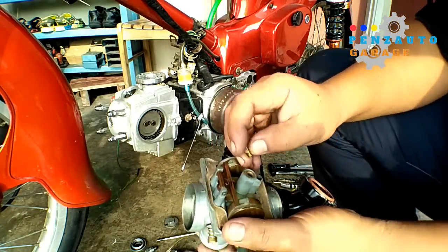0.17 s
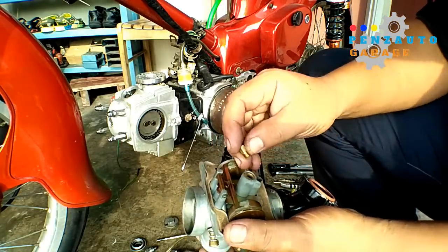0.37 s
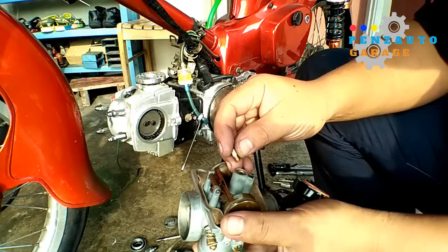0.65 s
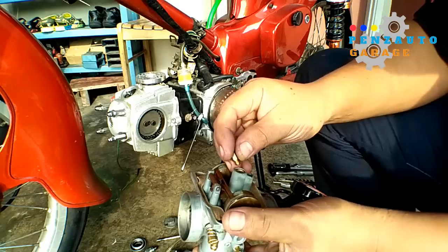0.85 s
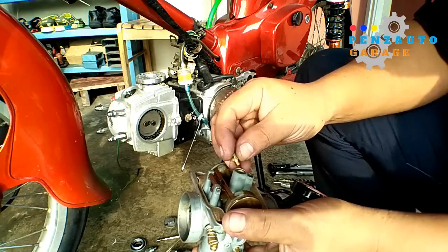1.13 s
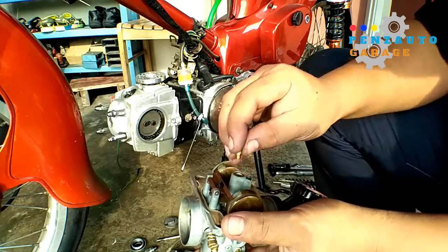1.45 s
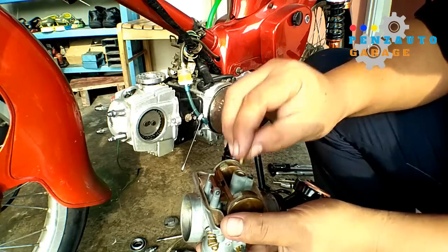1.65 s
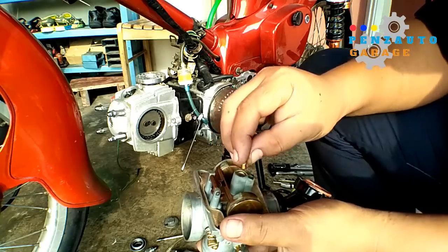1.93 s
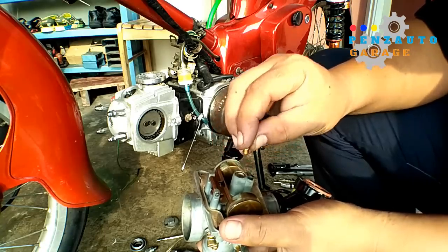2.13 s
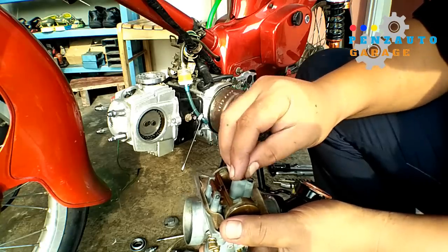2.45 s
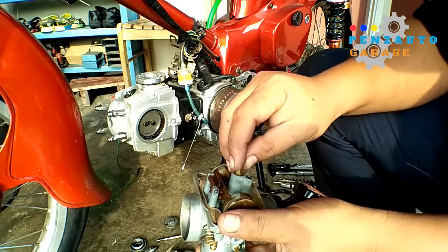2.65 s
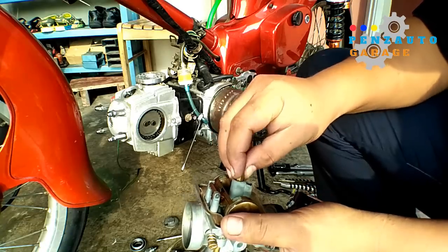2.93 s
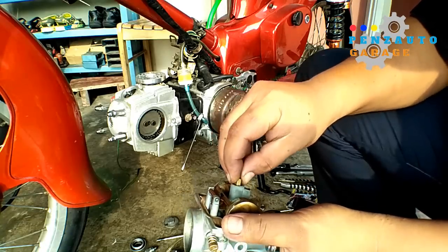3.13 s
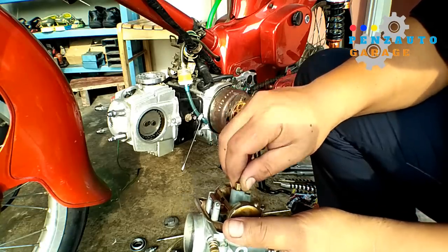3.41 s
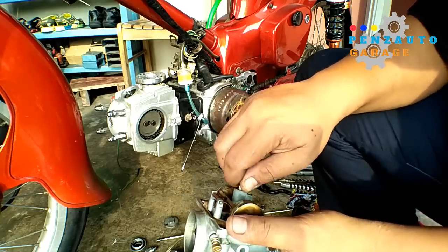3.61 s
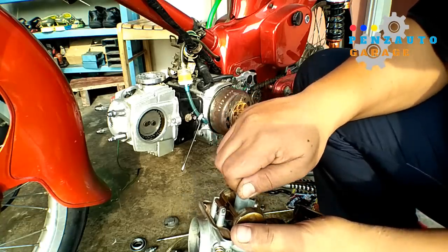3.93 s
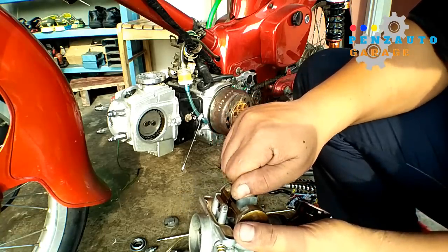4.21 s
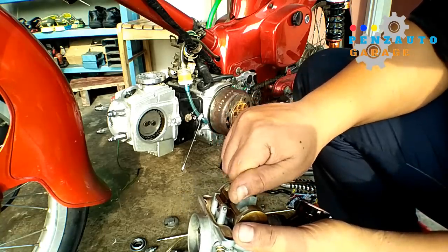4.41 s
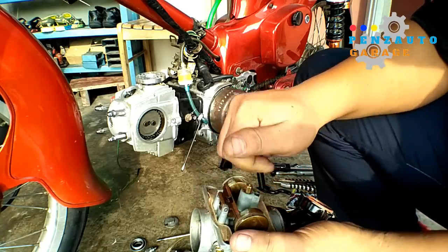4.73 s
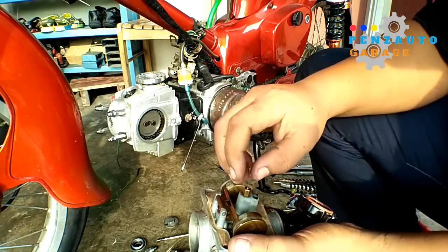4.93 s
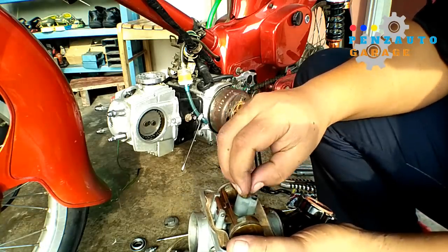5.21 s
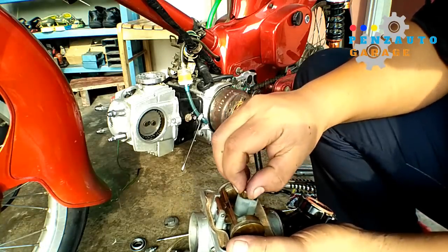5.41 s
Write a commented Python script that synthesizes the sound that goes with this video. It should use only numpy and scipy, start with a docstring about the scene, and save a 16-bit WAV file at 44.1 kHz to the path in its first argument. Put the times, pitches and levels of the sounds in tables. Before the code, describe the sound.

Small metal parts tick and snap hard into a carburettor body up close, over soft street rumble, a brief far squeal and insect buzz.

```python
"""Small brass parts are pushed into a hand-held carburettor body, close to a phone in an open workshop.
Each contact is a burst of uneven micro-impacts that also rings the casting's modes; a short room tail follows.
Outside: traffic and hiss (shaped noise), engine drones (wavering sines), a far squeal (gliding tone and noise),
a rasping bird (falling noise band) and a shrill insect (pulsed buzz and whistle).
The loudest snaps push the phone's gain down; it then recovers at 4 dB per second."""
import sys
import numpy as np
from scipy import signal
from scipy.fft import rfft, irfft
from scipy.io import wavfile
from scipy.ndimage import uniform_filter1d

SR = 44100
rng = np.random.default_rng(int(sys.argv[2]) if len(sys.argv) > 2 else 0)


def int16_out(signal):
    """Quantize to a 16-bit WAV file."""
    q = np.round(np.clip(np.atleast_2d(signal).T, -1, 1) * 32767)
    wavfile.write(sys.argv[1], SR, q.astype(np.int16))


N = 245181
T = np.arange(N) / SR


def undb(db):
    """Decibels to gain."""
    return 10 ** (np.asarray(db) / 20)


def unit(x):
    """Scale to rms 1."""
    return x / np.sqrt(np.mean(x ** 2))


def pan(db):
    """Port gains for a left minus right level difference."""
    return undb(np.vstack([db, -db]) / 2)


def bell(t, width_s):
    """Gaussian swell of height 1 around t = 0; width is one standard deviation."""
    return np.exp(-(t / width_s) ** 2 / 2)


def colour(x, points, size=4096):
    """Minimum-phase filter through (frequency [Hz], gain [dB]) points, built from the cepstrum."""
    hz, db = np.transpose(points)
    f = np.maximum(np.fft.rfftfreq(size, 1 / SR), 1)
    gain = undb(np.interp(np.log(f), np.log(hz), db))
    cepstrum = irfft(np.log(gain))
    # fold the cepstrum to make the response causal
    cepstrum[1:size // 2] *= 2
    cepstrum[size // 2 + 1:] = 0
    response = irfft(np.exp(rfft(cepstrum)))
    response = response.reshape((1,) * (x.ndim - 1) + (-1,))
    return signal.fftconvolve(x, response, axes=-1)[..., :x.shape[-1]]


def walk(rate_hz):
    """Slow random curve of rms 1: held random values, smoothed twice."""
    k = max(int(SR / rate_hz), 1)
    held = np.repeat(rng.standard_normal(N // k + 1), k)
    return unit(uniform_filter1d(uniform_filter1d(held, k), k)[:N])


def stereo_noise(side_db, size=N):
    """White noise for both ports: a shared part plus an opposed part at side_db."""
    mid, side = rng.standard_normal((2, size))
    return mid + undb(side_db) * side * np.array([[1], [-1]])


def band(hz, width_hz, side_db):
    """Noisy resonance: low-passed complex noise shifted to a centre that may move."""
    low = signal.butter(3, width_hz / 2, fs=SR, output="sos")
    slow = signal.sosfilt(low, stereo_noise(side_db) + 1j * stereo_noise(side_db))
    carrier = np.exp(2j * np.pi * np.cumsum(hz + 0 * T) / SR)
    return unit((slow * carrier).real)


def street(rumble_rest_db=-48.5, roar_rest_db=-55.5, air_db=-61.5):
    """Traffic rumble and tyre roar as swelling noise, engine drones as wavering sines, and a distant hiss."""
    # traffic swells: (peak time [s], width [s], rumble rise [dB], tyre roar rise [dB])
    traffic = [(.22, .16, 9, 11.5), (.92, 0.19, 7, 8.5), (1.5, 0.051, 1, 7), (2.7, 0.38, 6, 4.5),
               (5.6, 0.19, 9.5, 7.5)]
    # noise spectra: (frequency [Hz], relative density [dB per Hz])
    rumble_spectrum = [(20, -23.5), (45, -9.5), (70, -1), (95, 3.5), (130, -4.5), (200, -6), (300, -15),
                       (500, -20), (1500, -63)]
    roar_spectrum = [(100, -23.5), (300, 1.5), (550, -3), (900, -6), (1800, -11.5), (3000, -20.5),
                     (6000, -30.5), (16000, -29.5)]
    air_spectrum = [(100, -2), (2000, 6.5), (5000, 5.5), (9000, -1), (12000, -1.5), (16000, -17)]
    # engine drones: (start [s], end [s], mean pitch [Hz], mean level [dB])
    drones = [(-.2, 3.27, 93, -59), (-.2, 2.4, 146.3, -54), (-.2, 1.6, 191.2, -54.5),
              (-.2, 1.1, 427.8, -53), (3.25, 4.1, 276.7, -54), (4.851, 5.28, 316, -50.5),
              (5.002, 5.5, 463, -60), (5.2, 5.8, 128, -43.5)]

    peak_s, width_s, rumble_rise_db, roar_rise_db = np.transpose(traffic)
    passing = bell(T - peak_s[:, None], width_s[:, None])
    rumble_db = rumble_rest_db + rumble_rise_db @ passing + 1.4 * walk(26)
    roar_db = roar_rest_db + roar_rise_db @ passing + 0.84 * walk(25)
    out = unit(colour(stereo_noise(-19.0), rumble_spectrum)) * undb(rumble_db)
    out += unit(colour(stereo_noise(-1.5), roar_spectrum)) * undb(roar_db)
    for start_s, end_s, hz, db in drones:
        swell = np.clip(np.minimum(T - start_s, end_s - T) / 0.21, 0, 1)
        waver_db, drift_hz = 2.2 * walk(22), 3 * walk(22)
        tone = np.sqrt(2) * np.sin(2 * np.pi * np.cumsum(hz + drift_hz) / SR)
        out += swell * undb(db + waver_db) * tone
    return out + undb(air_db) * unit(colour(stereo_noise(-0.65), air_spectrum))


def squeal(attack_s=0.026, release_s=0.029):
    """Far squeal: a wavering tone in two noise bands, in gliding swells that move from right to left."""
    # swells: (peak time [s], level [dB], pitch at the peak [Hz], glide [Hz per s])
    squeals = [(.004, -30, 1010, 0), (.085, -38.5, 1000, -600), (.208, -32, 935, 698),
               (.42, -50.5, 830, 500), (.49, -43.5, 887, 500)]
    peak_s, db, peak_hz, glide_hz_per_s = np.transpose(squeals)[:, :, None]
    t = T - peak_s
    fade = np.maximum(-t / attack_s, t / release_s)
    swells = undb(db) * np.exp(-np.minimum(fade, 20))
    # the louder swell dominates the pitch
    glides_hz = peak_hz + glide_hz_per_s * np.clip(t, -.1, .1)
    hz = np.average(glides_hz, axis=0, weights=swells)
    tone = np.sqrt(2) * np.sin(2 * np.pi * np.cumsum(hz * (1 + 0.0188 * walk(120))) / SR)
    body = 0.73 * tone + 0.59 * band(hz, 145, 0) + 0.3 * band(hz, 420, 0)
    return swells.sum(axis=0) * body * pan(np.interp(T, [0, .2], [-6, 3]))


def chatter(decay_ms, tilt_db, grain_db, rise_share, side_db=-7, size=8192):
    """One contact: uneven micro-impacts that build as the parts bite, then die."""
    t, decay_s = np.arange(size) / SR, decay_ms / 1000
    # each impact radiates a little differently towards the two ports
    unevenness = undb(grain_db * np.minimum(rng.exponential(size=size), 3))
    impacts = stereo_noise(side_db, size) * unevenness
    pressure = np.exp(-t / decay_s) * (1 - np.exp(-t / (rise_share * decay_s)))
    # positive tilt thins the sound below 8 kHz and lifts it above
    tip = [(1000, -4 * tilt_db), (4500, -3 * tilt_db), (8000, 0), (20000, tilt_db / 2)]
    # longer bursts carry more energy
    return unit(colour(impacts * pressure, tip, size=256)) * np.sqrt(decay_s * SR / size)


def seating(db, decay_ms, tilt_db, grain_db, rise_share,
            slide_delay_s=.018, slide_decay_ms=21, slide_db=-22, slide_db_per_db=-0.12):
    """Force of a contact and the slide into its seat; the harder the blow, the smaller the slide's share."""
    bite = chatter(decay_ms, tilt_db, grain_db, rise_share)
    slide = chatter(slide_decay_ms, tilt_db / 2, grain_db, rise_share)
    slide = np.pad(slide, [(0, 0), (int(slide_delay_s * SR), 0)])[:, :bite.shape[1]]
    return undb(db) * (bite + undb(slide_db + slide_db_per_db * db) * slide)


def ring(force, blow_db, scatter_db=1.5, softening=.13, split_hz=22):
    """Decaying modes of the casting; light blows mostly wake the lowest, the grip damps and detunes them."""
    # casting modes: (nominal frequency [Hz], relative level [dB], t60 before the grip's cap [s])
    casting = [(2600, -2.5, .1), (2698, 3.5, .11), (3230, -10.5, .1), (3666, -10, .13), (3938, -5, .14),
               (4120, -5.5, 0.12), (4226, -8.5, 0.11), (4600, -17.5, .09), (5435, -3.5, .15),
               (5740, -4, .18), (5880, -5, .16), (6090, -9.5, .2), (6300, -10, .18), (6840, -15, .17),
               (7640, -10.5, .21), (8300, -13, .16), (9880, -13, .15), (10075, -7.5, .14),
               (10254, -9.5, .15), (11157, -10, .15), (11344, -7.5, .15), (11516, -9.5, .12),
               (12030, -10.5, .13), (13070, -11, .12), (14070, 1.5, .12), (14560, -7, .14),
               (15294, -4, .11)]
    t = np.arange(SR // 3) / SR
    hz, db, t60_s = np.transpose(casting)[:, :, None]
    pitch, weight, phase, port = rng.standard_normal((4, len(hz), 1))
    hz = hz * (1 + .0007 * pitch)
    sensitivity = softening * np.clip(np.log2(hz / 2700) * 2, .45, 2)
    db = db + scatter_db * weight + sensitivity * (blow_db - 15.5)
    angle = np.float32(2 * np.pi * (hz * t + phase))
    t60_s = np.minimum(t60_s, .19)
    fade = np.float32(undb(db)) * np.exp(np.float32(-np.log(1000) * t / t60_s))
    # each mode beats slowly, its level swelling and fading
    beat = np.cos(np.float32(np.pi * split_hz * (1 + weight / 3) * t))
    fade = fade * np.sqrt(np.float32(2)) * beat
    # each mode reaches the right port with its own phase shift
    left = np.sum(fade * np.sin(angle), axis=0)
    right = np.sum(fade * np.sin(angle + np.float32(port)), axis=0)
    # the ring builds up as the impacts feed it
    fed = np.cumsum(np.mean(force ** 2, axis=0))
    return np.array([left, right]) * np.sqrt(np.interp(np.arange(len(t)), np.arange(len(fed)), fed))


def parts(grain_db=4, rise_share=0.45, casting_db=-37):
    """Brass on casting: each contact's crack plus the ring it feeds, placed between the ports."""
    # contacts: (time [s], relative level [dB], chatter decay [ms], treble tilt [dB],
    #            relative casting ring [dB], left minus right [dB])
    contacts = [(0.103, -39, 21, -3, 0, 5), (.131, -36, 19, 4.5, 6, -3), (.18, -34.5, 13, -1.5, 11, 6),
                (.313, -55, 0.94, -12.5, 23, -1), (0.3573, -34, 4.5, 4, 1, 10.5),
                (0.597, -47.5, 37, -2.5, -15, -7), (0.921, -43, 27, -1.5, -11, -2),
                (1.533, -24, 7.8, 1, -19.5, 3), (1.5388, 2.5, 3.7, 9.5, -19, 5),
                (1.543, -4, 3.2, 4.5, -19, -6), (1.5752, -10, 2.2, 2, -11.5, 5),
                (1.606, -16, 9, 3.5, -13, 0), (1.755, -4, 12, 1, -0.5, 4.5),
                (1.7643, 2, 3.5, -0.5, -2, 8.5), (1.7697, 5.5, 8.7, 2, -3, .5),
                (1.777, 4, 3, 5.5, -9, -4.5), (1.8828, -28, 4.7, 0, -13, -2),
                (2.3213, 1, 5.7, -3.5, -3.5, 2), (2.325, 12, 7.3, -1.5, 2, -1.5),
                (2.332, 13.5, 4.9, -5.5, -0.5, 11), (2.347, 7, 3.1, 9, 0.5, 6),
                (2.7, -41, 17, 0.5, -1.5, 4), (3.344, -30.5, 19, 0, -9.5, 2),
                (3.381, -21, 4.1, 0.5, -11, 2.5), (4.368, -24.5, 2.5, 1, -17, 2.5),
                (4.388, -39.5, 16, 0.5, -17.5, 3.5), (4.597, -30, 7, 10, -5, -3),
                (4.697, -29, 13, 8, -3, -0.5), (4.745, -32.5, 14, 3.5, -15, 2.5),
                (4.776, -26.5, 7.1, 10, -3, 11), (4.785, -18.5, 7.8, 7.5, -2.5, 1),
                (5.019, -38.5, 7.6, 12.5, -9.5, -3), (5.2013, -40.5, 2.2, -2, -6, -2.5),
                (5.221, -37.5, 6.5, 4, 0.5, 0), (5.3346, -39, 2.9, 6, -3.5, -2)]
    # crack spectrum: (frequency [Hz], relative density [dB per Hz])
    crack_spectrum = [(30, -41), (300, -34.5), (600, -20.5), (1000, -21), (1900, -16.5), (2700, -7),
                      (3400, -8), (4100, -10), (4800, -9.5), (5600, 3), (6700, 1), (8000, -3.5),
                      (11000, -.5), (16000, -6)]
    cracks, rings = np.zeros((2, 2, N + SR))
    for s, db, decay_ms, tilt_db, ring_db, pan_db in contacts:
        force = seating(db, decay_ms, tilt_db, grain_db, rise_share)
        tone, i = ring(force, db), int(s * SR)
        cracks[:, i:i + force.shape[1]] += force * pan(pan_db)
        rings[:, i:i + tone.shape[1]] += tone * undb(ring_db) * pan(pan_db)
    return colour(cracks[:, :N], crack_spectrum) + undb(casting_db) * rings[:, :N]


def workshop(x, near_db=-6, near_s=0.00099, room_db=-15, room_t60_s=0.23, room_rise_s=0.0034):
    """Hands and nearby metal scatter the sound at once; the cluttered room adds a short diffuse tail."""
    # room colour: (frequency [Hz], gain [dB])
    room_colour = [(200, -3), (1500, -1.5), (2700, -1.5), (3300, 0.5), (4100, 0.5), (4850, -5), (5700, 1.5),
                   (6700, -0.5), (8000, 2.5), (12000, -3.5), (16000, -8)]
    t = np.arange(SR // 2) / SR
    near, far = rng.standard_normal((2, 2, len(t)))
    near = undb(near_db) * unit(near * np.exp(-t / near_s))
    tail = np.exp(-np.log(1000) * t / room_t60_s) * (1 - np.exp(-t / room_rise_s))
    far = undb(room_db) * unit(colour(far, room_colour) * tail)
    # the left port lags by two samples
    direct = np.array([np.roll(x[0], 2), x[1]])
    scattered = signal.fftconvolve(x, near, axes=-1)
    scattered = scattered + signal.fftconvolve(x.mean(axis=0, keepdims=True), far, axes=-1)
    return direct + scattered[:, :N] / np.sqrt(len(t))


def bird(width_hz=2100):
    """Harsh, toneless calls: a wide noise band that falls in pitch."""
    # rasps: (peak time [s], width [s], level [dB], starting centre [Hz], final centre [Hz])
    rasps = [(0.897, 0.034, -34.5, 5100, 4117), (1.003, 0.048, -53.5, 4840, 4570),
             (2.305, 0.017, -41, 4830, 4078), (3.98, .014, -42.5, 5190, 4714),
             (4.049, 0.041, -44.5, 4620, 3920), (5.08, 0.033, -52, 4400, 3820)]
    peak_s, width_s, db, from_hz, to_hz = np.transpose(rasps)
    swell = undb(db) @ bell(T - peak_s[:, None], width_s[:, None])
    times = np.column_stack([peak_s - 2 * width_s, peak_s + width_s]).ravel()
    hz = np.interp(T, np.sort(times), np.column_stack([from_hz, to_hz]).ravel())
    return band(hz, width_hz, -2) * swell * pan(-3.5)


def phrasing(attack_s=0.13, release_s=0.19, start_hz=8150, end_hz=7230, sink_s=0.28,
             accent_after_s=0.23, accent_width_s=0.11):
    """Insect whistle pitch, buzz gain and whistle gain; in each phrase the whistle flares early and sinks."""
    # phrases: (start [s], length [s], relative buzz level at mid-phrase [dB], buzz crescendo [dB per s],
    #           whistle level [dB], whistle accent [dB])
    phrases = [(2.243, 0.97, -44.5, 1.5, -58, 3.5), (3.773, 0.52, -51, 7, -67.5, 17),
               (4.57, 1.6, -52, 10.5, -67.5, 23)]
    hz, buzz, whistle = np.full(N, float(start_hz)), 0, 0
    for start_s, length_s, buzz_db, crescendo_db_per_s, whistle_db, accent_db in phrases:
        t = T - start_s
        gate = np.clip(np.minimum(t / attack_s, (length_s - t) / release_s), 0, 1)
        sinking_hz = end_hz + (start_hz - end_hz) * np.exp(-(t / sink_s) ** 2)
        hz = np.where(t > 0, sinking_hz, hz)
        buzz = buzz + gate * undb(buzz_db + crescendo_db_per_s * (t - length_s / 2))
        accent = accent_db * bell(t - accent_after_s, accent_width_s)
        whistle = whistle + gate * undb(whistle_db + accent)
    return hz, buzz, whistle


def insect(buzz_db=-6.0, pulse_hz=200, depth=0.46):
    """Fast pulses drive a high buzz and a lower resonance that sinks through each phrase."""
    # buzz spectrum: (frequency [Hz], relative density [dB per Hz])
    buzz_spectrum = [(3000, -53), (8600, -20.5), (9800, 2), (11000, 0), (11900, 2.5), (12700, -17.5),
                     (16000, -29.5)]
    hz, buzz_gain, whistle_gain = phrasing()
    rate_hz = pulse_hz * (1 + .05 * walk(30))
    pulses = 1 + depth * np.sin(2 * np.pi * np.cumsum(rate_hz) / SR)
    buzz = unit(colour(stereo_noise(-1.3), buzz_spectrum)) * buzz_gain * undb(buzz_db) * pan(-2.3)
    whistle = band(hz, 620, -4.0) * whistle_gain * pan(-8)
    return pulses * (buzz + whistle)


def scene():
    """The work at hand over the sounds from outside."""
    return workshop(parts()) + street() + squeal() + insect() + bird()


def gain_control(x, threshold_db=-23, release_db_per_s=4.0, ahead_s=0.0017):
    """Two-to-one compression that drops at once on a loud snap and recovers slowly."""
    power = uniform_filter1d(np.mean(x ** 2, axis=0), SR // 300)
    level_db = 10 * np.log10(np.maximum(power, 1e-12))
    cut_db = np.maximum(level_db - threshold_db, 0) / 2
    # running maximum against a falling line: instant attack, linear release
    held_db = np.maximum.accumulate(cut_db + release_db_per_s * T) - release_db_per_s * T
    smooth_db = uniform_filter1d(held_db, size=128)
    return x * undb(-np.interp(T + ahead_s, T, smooth_db))


def record(dry, top_hz=15800):
    """The phone's two ports colour the sound; gain control, full-scale clipping and a steep low-pass follow."""
    # port colours: (frequency [Hz], gain [dB])
    left_port = [(500, -3), (2700, -3.5), (5000, -4.5), (8500, -0.5), (11000, -1.5), (12500, 3), (14200, 6),
                 (16000, 1)]
    right_port = [(500, -3), (2700, -2.5), (5000, -3), (8500, -1), (11200, 9.5), (12500, 2.5), (14200, 0),
                  (16000, -22)]
    ports = np.array([colour(dry[0], left_port), colour(dry[1], right_port)])
    clipped = np.clip(gain_control(ports), -1, 1)
    low_pass = signal.ellip(8, .2, 70, top_hz, fs=SR, output="sos")
    return signal.sosfilt(low_pass, clipped)


dry = scene()
out = record(dry)
int16_out(out)
```